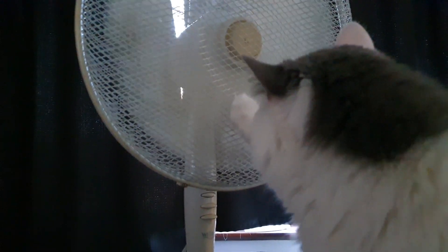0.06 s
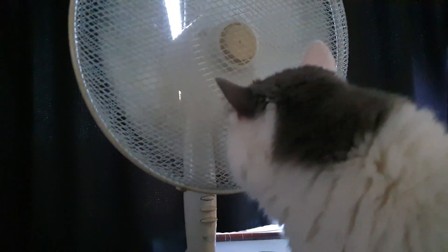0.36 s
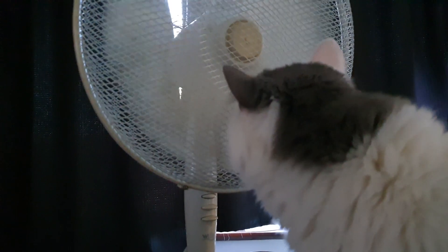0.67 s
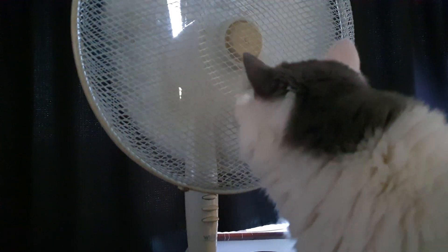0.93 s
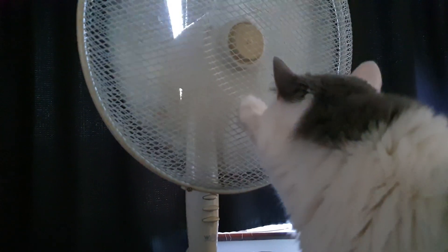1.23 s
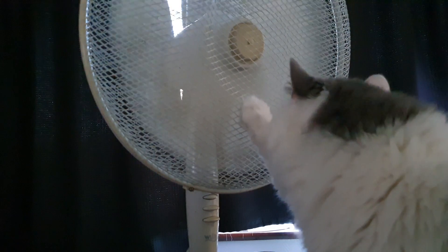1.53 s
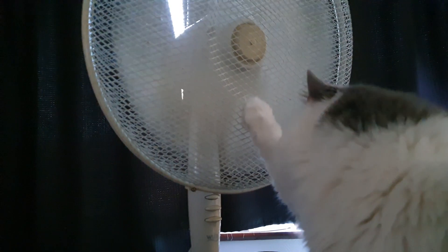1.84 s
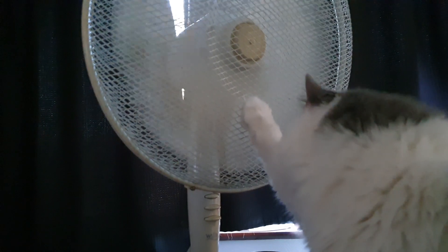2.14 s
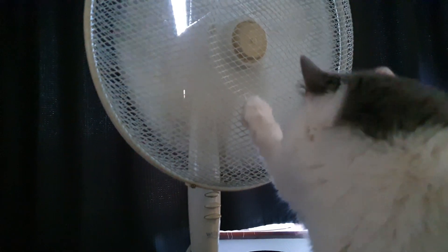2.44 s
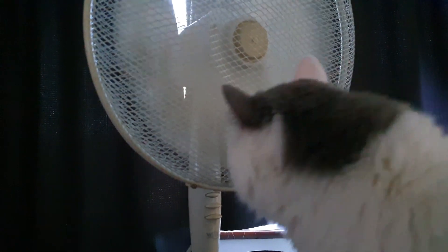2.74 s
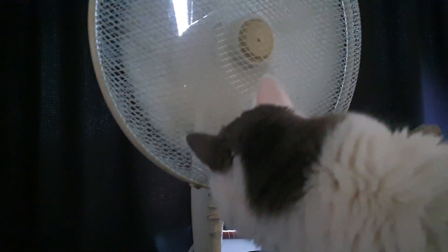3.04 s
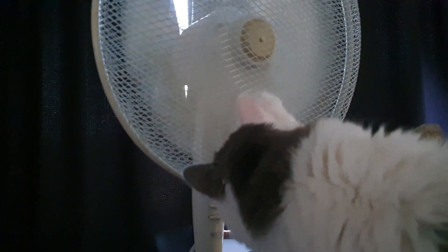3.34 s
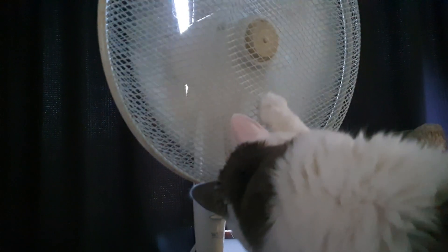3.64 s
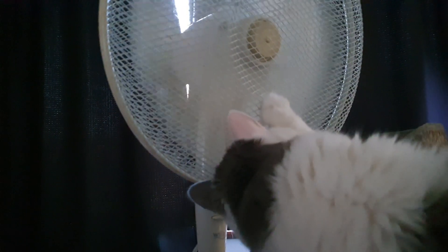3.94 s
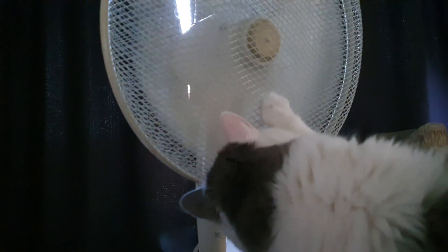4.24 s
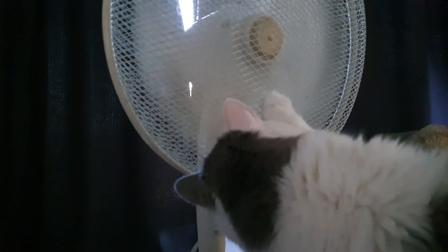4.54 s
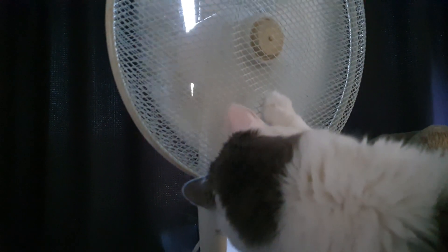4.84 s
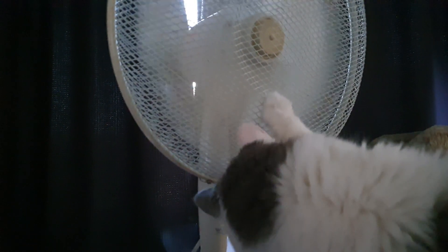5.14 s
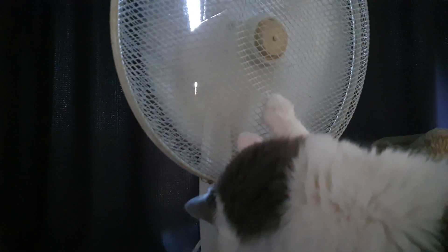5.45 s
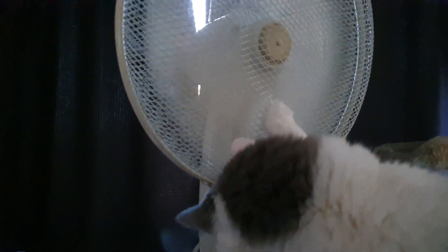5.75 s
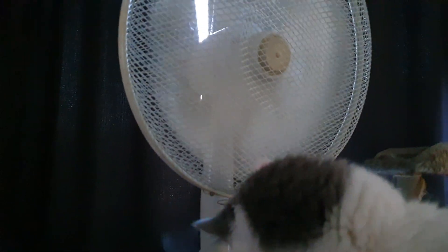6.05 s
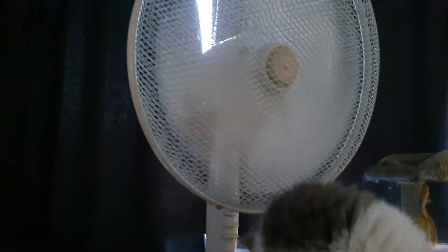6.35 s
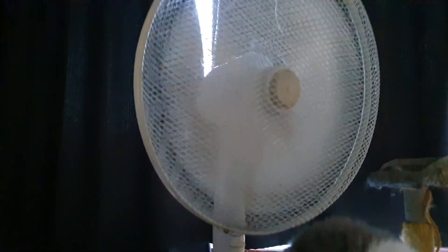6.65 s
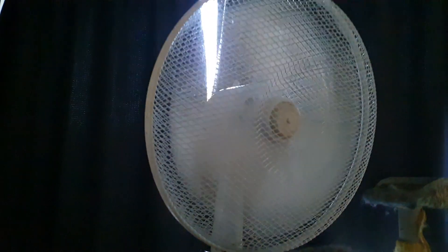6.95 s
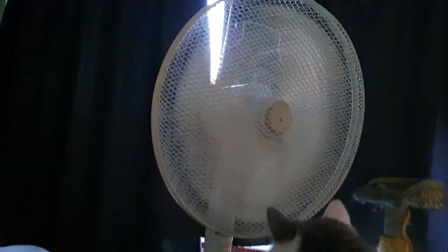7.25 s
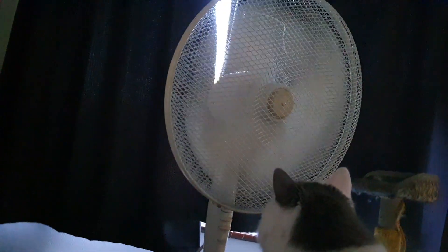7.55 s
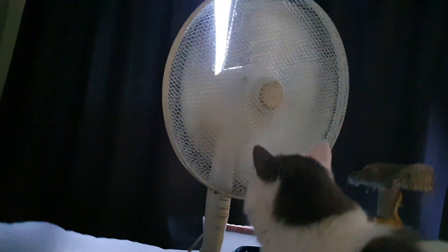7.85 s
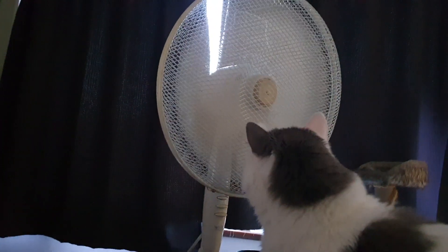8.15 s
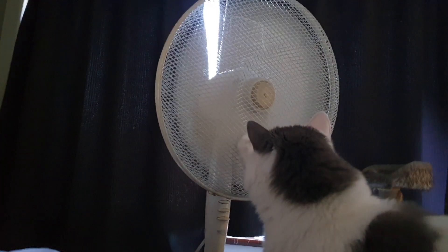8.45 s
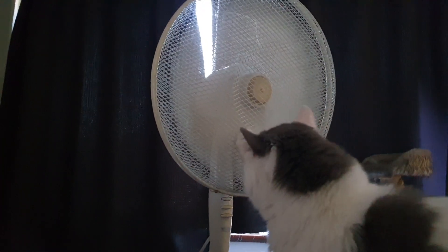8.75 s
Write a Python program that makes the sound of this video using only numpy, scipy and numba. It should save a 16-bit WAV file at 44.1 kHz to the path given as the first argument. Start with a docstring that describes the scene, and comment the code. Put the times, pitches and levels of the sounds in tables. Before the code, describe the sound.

An electric fan runs throughout, close by in a small room, with a soft, low, slowly pulsing hum and a steady rush of air. In the first second a cat paws its wire guard in three quick clusters of ringing metallic rattles, mixed with soft low handling bumps. The bass dips now and then on the right until about 4 seconds. Another rattle comes at 3 seconds and a sharper, brighter one at 4. Around 5.9 to 6.2 seconds the guard chatters again, with a brief low shudder from the stand. The air swells, and from 6 to 8 seconds low, rumbling gusts buffet the right side of the microphone, louder than everything else, over faint cloth rustling. A small knock joins a sharp gust at 7.3 seconds. A weak rattle and light rub follow at 8.3 seconds, and the fan carries on.

```python
"""A cat paws at the wire guard of a running pedestal fan; small room, hand-held phone close by, stereo.
Each pat makes the loose guard chatter on its rim: the mesh rings brightly and the frame rings low.
The motor hum beats against a blade tone over a rush of air; early on, the bass dips on the right.
Around 6 s the phone moves through the air stream: the rush swells, gusts buffet the right microphone
and cloth rustles."""
import sys
import numpy as np
from scipy import signal
from scipy.fft import rfft, irfft, next_fast_len
from scipy.io import wavfile
from numba import njit

SR = 44100
rng = np.random.default_rng(int(sys.argv[2]) if len(sys.argv) > 2 else 0)


def dump_mix(stems):
    """Bounce the given channels to the path in sys.argv[1] as a 16-bit WAV at rate SR."""
    frames = np.atleast_2d(stems).T  # one column per channel
    limited = np.clip(frames, -1, 1)  # hard clip at full scale
    pcm = np.round(limited * 32767).astype(np.int16)
    wavfile.write(sys.argv[1], SR, pcm)


N = 387638
TIME = np.arange(N) / SR
BLADE_HZ = 49.093  # rate at which the blades pass


def undb(db):
    """Decibels to gain."""
    return 10 ** (np.asarray(db) / 20)


def over_hz(points, size):
    """Rows of (freq_hz, value) read at every bin of a spectrum."""
    hz, value = np.transpose(points)
    return np.interp(np.log(np.fft.rfftfreq(size, 1 / SR) + 1), np.log(hz), value)


def colour(x, points):
    """Filter a sound by a curve of (freq_hz, gain_db) points."""
    size = next_fast_len(x.shape[-1])
    return irfft(rfft(x, size) * undb(over_hz(points, size)), size)[..., :x.shape[-1]]


def butter(x, hz, kind, order=2):
    """Plain low-pass or high-pass."""
    return signal.sosfilt(signal.butter(order, hz, kind, fs=SR, output="sos"), x)


def level(x, db=0):
    """Set the rms level."""
    return x * undb(db) / np.sqrt(np.mean(x ** 2))


def unit(x):
    """Scale to a mean energy of 1 per channel."""
    return x / np.sqrt(np.mean(np.sum(x ** 2, axis=-1)))


def pan(x, db):
    """Place a sound by its left minus right level."""
    return x * undb(np.array([[db], [-db]]) / 2)


def add(out, start_s, x):
    """Mix a sound in at a time."""
    start = int(start_s * SR)
    out[..., start:start + x.shape[-1]] += x[..., :N - start]


def wobble(hz, size=N):
    """Random motion of unit rms, mostly slower than hz."""
    return level(butter(rng.standard_normal(size), hz, "low"))


def fade(t, t60):
    """Exponential decay, 60 dB down after t60 seconds."""
    return np.exp(-np.log(1000) * t / t60)


def burst(start_s, hold_s, attack_s, release_s):
    """Envelope that rises to 1 by the start, holds, then dies away exponentially."""
    before = np.maximum(start_s - TIME, 0)
    after = np.maximum(TIME - start_s - hold_s, 0)
    return np.exp(-(before / attack_s) ** 2 - after / release_s)


def swell(crest_s, rise_db_per_s, fall_db_per_s):
    """Gain that grows steadily to 1 at its crest and then fades steadily."""
    return undb(np.minimum(rise_db_per_s * (TIME - crest_s), fall_db_per_s * (crest_s - TIME)))


def fan_hum(motor_hz, motor_db, blade_db, second_db, beat_crest_s):
    """The second blade harmonic lies just under the motor hum, so the two beat slowly."""
    # faint steady tones of the housing: pitch_hz, level_db
    housing = [(76.2, -65.5), (112.9, -69), (150.2, -78), (301, -88)]
    tones = [(motor_hz, motor_db), (BLADE_HZ, blade_db), (2 * BLADE_HZ, second_db)] + list(housing)
    t = TIME - beat_crest_s
    return pan(sum(np.sqrt(2) * undb(db) * np.cos(2 * np.pi * hz * t) for hz, db in tones), db=-2)


def air_rush(db, flutter, swell_db, crest_s, width_s, sink_db_per_s):
    """Blade turbulence sinks very slowly and swells once as the phone crosses the air stream."""
    # spectrum of the air at the left and right microphones: freq_hz, gain_db
    air_left = [(25, -3.5), (50, -5), (115, 1), (180, -8.5), (480, -6.5), (600, -12.5), (1400, -17.5),
                (2000, -20), (3600, -33.5), (5400, -41.5), (6700, -34.5), (7400, -45.5), (8200, -44.5),
                (15500, -47.5)]
    air_right = [(25, -18), (50, 1), (115, 4.5), (180, -4.5), (480, -5), (1000, -10.5), (1400, -19.5),
                 (2000, -18.5), (3100, -25), (3700, -33.5), (5700, -38), (6700, -36), (7500, -48),
                 (15500, -49)]
    # likeness of the air at the two microphones: freq_hz, correlation
    air_likeness = [(60, 0.5), (300, 0.92), (640, 0.83), (1400, 0.3), (3100, 0.091), (6800, 0)]
    alike = np.clip(over_hz(air_likeness, N), 0, 1)
    mid, side = rfft(rng.standard_normal((2, N))) * np.sqrt([1 + alike, 1 - alike])
    rush = np.array([colour(irfft(mid + side, N), air_left), colour(irfft(mid - side, N), air_right)])
    crossing = np.exp(-((TIME - crest_s) / width_s) ** 2 / 2)
    flow = undb(swell_db * crossing - sink_db_per_s * TIME)
    blade_pulse = 1 + flutter * np.sin(2 * np.pi * 2 * BLADE_HZ * TIME)
    return level(rush, db) * flow * blade_pulse


def chatter(t, length_s, clicks_per_s, scatter_db):
    """Wire bouncing on the rim: a first click, then uneven ones that die away."""
    clicks = rng.random(len(t)) < clicks_per_s / SR
    size = rng.standard_normal(len(t))
    force = clicks * np.sign(size) * undb(scatter_db * np.abs(size))
    force[0] = 1
    return force * np.exp(-(t / length_s) ** 2 / 2)


def mesh_ring(t, wire_t60, room_t60, room_db, click_db, mode_count=2500):
    """Answer of the mesh to one click: the click itself, a crowd of wire modes and the room's tail."""
    modes = np.zeros((2, len(t) // 2 + 1))
    modes[:, rng.permutation(len(t) // 2)[:mode_count]] = rng.standard_normal((2, mode_count))
    wires = unit(irfft(modes, len(t)) * fade(t, wire_t60))
    tail = rng.standard_normal((2, len(t))) * fade(t, room_t60) * (1 - np.exp(-t / 0.0012))
    ring = wires + undb(room_db) * unit(tail)
    ring[:, 0] += undb(click_db)
    return ring


def pawed_guard(mesh_db, frame_db, spot_db):
    """Every pat drives the mesh and the frame; claws are bright, pads are dull."""
    # paw contacts and their push on the rim: start_s, level_db, chatter_s, bright_db, push_db
    pats = [(0.032, -8, 0.032, -14, -4.5), (0.44, -1, 0.017, -5.5, -2), (0.483, -11, 0.037, 3, 7),
            (.512, -6, 0.0049, -11, 3), (0.541, -12.5, 0.0047, 1, -4), (0.589, -2, 0.0088, -10.5, 6),
            (0.827, 0.5, 0.0045, -5, -4.5), (.833, 1.5, 0.016, 4, -8), (0.887, 2.5, 0.011, -4, 2.5),
            (2.955, 1, 0.0096, -8, -3.5), (2.965, -6, 0.015, 7, -7), (2.996, -8, 0.0084, 13, 4),
            (3.03, 0.5, 0.012, -5, 8), (3.952, 6.5, 0.0091, 18, -20), (3.963, 4, 0.011, 7.5, -18),
            (5.879, -6.5, 0.049, -7.5, -15), (6.024, -3, 0.034, -19, 3.5), (6.093, -4.5, 0.0072, -23, 2),
            (6.14, 4, 0.011, -8, 4.5), (6.164, 4, 0.03, -2, -1.5), (6.196, 2.5, 0.019, -18, -0.5),
            (8.261, -13.5, 0.02, -10, -17), (8.285, -11, 0.04, -9, -25)]
    # modes of the guard's frame: pitch_hz, level_db, t60_s, push_factor
    frame_modes = [(159.8, 6, 0.24, 0.66), (222.8, 3.5, 0.12, 0.2), (433.5, 4.5, 0.16, 0.76),
                   (446.7, 8, 0.16, 0.9), (487, 2, 0.34, 0.5), (556, -19, 0.085, 0.9),
                   (622, 2.5, 0.2, 0.01), (690, -26, 0.1, 0.04), (1060, -6.5, 0.16, 0),
                   (1412, -10, 0.072, 0.2), (1433, -11, 0.041, 1), (1580, -9.5, 0.098, 0.6),
                   (1790, -39, 0.064, 0), (1940, -13, 0.046, 0.3), (2155, -5, 0.037, 0.7),
                   (2310, -9.5, 0.036, 0.1), (2786, -19, 0.077, 0), (5760, -24, 0.05, -.5)]
    # colour of the wire mesh: freq_hz, gain_db
    mesh_colour = [(150, 10), (400, 3.5), (800, 3.5), (1500, 2.5), (2500, 1.5), (4000, 0), (5700, -3.5),
                   (7000, -5), (7800, -12.5), (10000, -10.5), (13000, -11.5), (16000, -25)]
    out = np.zeros((2, N))
    t, brief = np.arange(SR // 3) / SR, np.arange(SR // 8) / SR
    lead = 128  # samples of space for the colour filter's pre-ring
    mode_hz, mode_db, mode_t60, push_factor = np.transpose(frame_modes)
    modes = np.sin(2 * np.pi * mode_hz[:, None] * brief) * fade(brief, mode_t60[:, None])
    for start_s, db, chatter_s, bright_db, push_db in pats:
        force = chatter(brief, chatter_s, clicks_per_s=600, scatter_db=5)[None]
        # each pat lands on other wires
        mesh = mesh_ring(t, wire_t60=0.11, room_t60=0.33, room_db=3, click_db=-10.5)
        rattle = signal.fftconvolve(mesh, force, axes=1)
        ring = colour(np.pad(rattle, ((0, 0), (lead, 0))), mesh_colour)[:, lead:]
        dull = butter(ring, 3900, "low", order=1)
        bright = undb(bright_db) * pan(ring - dull, db=0.5)
        add(out, start_s, undb(db + mesh_db) * unit(dull + bright))
        # each spot favours other modes of the frame, and the two microphones hear them differently
        scatter_db = spot_db * rng.standard_normal((2, len(frame_modes)))
        weights = undb(mode_db + push_factor * push_db + scatter_db)
        frame = signal.fftconvolve(modes, force, axes=1)
        frame /= np.linalg.norm(frame, axis=1, keepdims=True)
        add(out, start_s, undb(db + frame_db) * pan(weights @ frame, db=-3.5))
    return out


def handling(bump_db, knock_top_hz, knock_t60):
    """The hand bumps the phone softly and knocks twice on its body, alike in both channels."""
    # low bumps: centre_s, level_db, half_width_s, pitch_hz
    bumps = [(0.077, -30, 0.008, 68.5), (0.234, -36, 0.022, 74.4), (0.292, -34, 0.0082, 65),
             (0.344, -28, 0.0083, 83), (0.38, -32.5, 0.026, 59.4), (0.542, -31.5, 0.017, 72),
             (0.676, -34.5, 0.0086, 83.6), (.918, -35.5, 0.0062, 110), (1.171, -36, 0.0065, 81),
             (2.786, -48, 0.061, 62)]
    # small knocks: start_s, energy_db
    knocks = [(7.297, -17.5), (8.111, -27)]
    out, t = np.zeros((2, N)), np.arange(SR // 10) / SR
    for centre_s, db, half_width_s, hz in bumps:
        offset = TIME - centre_s
        tone = np.sin(2 * np.pi * (hz * offset + rng.random()))
        out += undb(db + bump_db) * np.exp(-(offset / half_width_s) ** 2) * tone
    for start_s, db in knocks:
        knock = butter(rng.standard_normal(len(t)) * fade(t, knock_t60), knock_top_hz, "low", order=4)
        add(out, start_s, undb(db) * unit(butter(knock, 330, "high")))
    return out


def restless_air(db, low_hz, high_hz, flicker_db):
    """A flickering middle band of the rush opens as the phone moves, different at each microphone."""
    band = butter(rng.standard_normal((2, N)), high_hz, "low", order=6)
    band = butter(band, low_hz, "high", order=3)
    flicker = undb(flicker_db * wobble(hz=11.7))
    return level(band * flicker, db) * swell(crest_s=6.33, rise_db_per_s=14.5, fall_db_per_s=4)


def stand_groan(start_s, db, hold_s, pitch_hz):
    """A brief low shudder of the stand as the paw lets go."""
    hz = pitch_hz * (1 + 0.018 * wobble(hz=60))
    tone = np.sin(2 * np.pi * np.cumsum(hz) / SR)
    return level(tone, db) * burst(start_s, hold_s, attack_s=0.012, release_s=0.022)


def gusts(attack_s=0.01, release_s=0.011, wake_db=-12, wake_s=0.095, breeze_db=-49.5):
    """Strength and eddy rate of the draught: quick gusts with weak wakes over a light breeze."""
    # gusts on the right microphone: start_s, level_db, hold_s, eddy_hz
    puffs = [(5.996, -27, .012, 62.1), (6.222, -19.5, 0.013, 63.5), (6.297, -20, .04, 76),
             (6.465, -30.5, 0.078, 74.94), (6.57, -24, .125, 78.2), (6.872, -26, 0.095, 68),
             (7.245, -24, 0.0056, 61.1), (7.293, -16, .006, 58.06), (7.773, -29.5, .085, 70.07)]
    starts, _, _, eddy_hz = np.transpose(puffs)
    power = (undb(breeze_db) * burst(starts[0], starts[-1] - starts[0], attack_s, wake_s)) ** 2
    for start_s, db, hold_s, _ in puffs:
        power += (undb(db) * burst(start_s, hold_s, attack_s, release_s)) ** 2
        power += (undb(db + wake_db) * burst(start_s, hold_s, attack_s, wake_s)) ** 2
    return np.sqrt(power), np.interp(TIME, starts, eddy_hz)


def draught(wander, rough_db, steepness, left_db):
    """Eddies rock the air in the right microphone port; fast, strong gusts break into rougher noise."""
    strength, eddy_hz = gusts()
    hz = eddy_hz * np.exp(wander * np.tanh(wobble(hz=34.04)))
    eddies = level(np.sin(2 * np.pi * np.cumsum(hz) / SR))
    rumble = butter(rng.standard_normal(N), 158.5, "low", order=4)
    rough = level(butter(rumble, 36, "high"), rough_db)
    breakup = np.sqrt(strength / strength.max()) * (eddy_hz / eddy_hz.max()) ** steepness
    buffet = butter(strength * (eddies + rough * breakup), 25, "high")
    return np.array([undb(left_db) * buffet, buffet])


def cloth(db, grain_db, slip_db, treble_pan_db):
    """Fibres catch and slip: a grainy, uneven hiss whose top lies to the left."""
    # colour of sliding cloth: freq_hz, gain_db
    cloth_colour = [(400, -12), (800, 5), (1400, 11.5), (1900, -13), (2700, 8), (4200, 1), (5500, 5.5),
                    (7000, 5), (8000, -1), (11000, -7), (13000, -14), (15500, -31)]
    friction = undb(grain_db * wobble(hz=120) + slip_db * wobble(hz=21))
    hiss = colour(rng.standard_normal((2, N)) * friction, cloth_colour)
    body = butter(hiss, 6000, "low")
    top = pan(butter(hiss[::-1], 11700, "high"), treble_pan_db)
    return level(body + top, db) * swell(crest_s=6.716, rise_db_per_s=28, fall_db_per_s=15)


def rubs(grain_db):
    """Paw and cloth rub lightly: short grainy swishes, each in its own band."""
    # light rubs: centre_s, level_db, half_width_s, low_hz, high_hz
    swishes = [(6.642, -63, 0.041, 4900, 6200), (6.7, -70, .02, 8500, 12500),
               (6.79, -67, 0.028, 4000, 11000), (7.3, -73.5, 0.055, 4500, 12000),
               (8.306, -55, 0.032, 1490, 3000)]
    out, t = np.zeros((2, N)), np.arange(SR // 3) / SR
    middle = t[-1] / 2
    for centre_s, db, half_width_s, low_hz, high_hz in swishes:
        grain = undb(grain_db * wobble(hz=150, size=len(t)))
        hiss = rng.standard_normal((2, len(t))) * grain
        band = butter(butter(hiss, high_hz, "low", order=4), low_hz, "high", order=4)
        envelope = np.exp(-((t - middle) / half_width_s) ** 2 / 2)
        add(out, centre_s - middle, level(band, db) * envelope)
    return out


@njit
def moving_high_pass(x, hz):
    """State-variable high-pass whose corner may move at every sample."""
    y, band, low = np.empty(len(x)), 0., 0.
    damping = np.sqrt(2.)
    for i in range(len(x)):
        gain = np.tan(np.pi * hz[i] / SR)
        mid = (band + gain * (x[i] - low)) / (1 + gain * (gain + damping))
        y[i] = x[i] - damping * mid - (low + gain * mid)
        band, low = 2 * mid - band, low + 2 * gain * mid
    return y


def scene():
    """Fan and cat at close range, with wind, hand and cloth noise at the phone."""
    fan = fan_hum(motor_hz=100.02, motor_db=-52.5, blade_db=-65, second_db=-60, beat_crest_s=4.45)
    fan += air_rush(db=-53.5, flutter=0.034, swell_db=4.5, crest_s=6.24, width_s=0.68,
                    sink_db_per_s=0.1246)
    fan += restless_air(db=-58, low_hz=1060, high_hz=1500, flicker_db=3)
    cat = pawed_guard(mesh_db=-11.5, frame_db=-24.5, spot_db=2.5)
    cat += stand_groan(start_s=5.925, db=-39.5, hold_s=0.097, pitch_hz=125)
    wind = draught(wander=0.46, rough_db=1.5, steepness=5.8, left_db=-26.5)
    hand = handling(bump_db=-1, knock_top_hz=603, knock_t60=0.014)
    rustle = rubs(grain_db=2.5) + cloth(db=-61.5, grain_db=1, slip_db=1, treble_pan_db=14.5)
    return fan + cat + wind + hand + rustle


def record(dry):
    """The phone's two channels: the bass comes and goes on the right; the top is cut steeply on both."""
    # bass dropouts on the right: start_s, hold_s, corner_rise_hz
    dropouts = [(0.806, 0.033, 260), (1.023, 0.084, 280), (1.284, 0.56, 310), (2.085, 0.11, 270),
                (2.39, .22, 307), (3.14, .06, 170), (3.538, 0.19, 170)]
    low_cut_hz, top_hz, bass_leak_db = 26, 15750, -28.5
    left, right = dry
    rises = [hz * burst(s, hold_s, attack_s=0.047, release_s=0.055) for s, hold_s, hz in dropouts]
    corner_hz = low_cut_hz + np.max(rises, axis=0)
    # run forwards and backwards, the filter leaves both sides in step
    forwards = moving_high_pass(right, corner_hz)
    thin = moving_high_pass(forwards[::-1].copy(), corner_hz[::-1].copy())[::-1]
    right = thin + undb(bass_leak_db) * (right - thin)
    top_cut = signal.ellip(10, .2, 80, top_hz, fs=SR, output="sos")
    return signal.sosfilt(top_cut, np.array([left, right]))


dry = scene()
out = record(dry)
dump_mix(out)
```